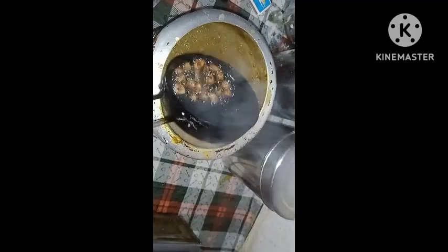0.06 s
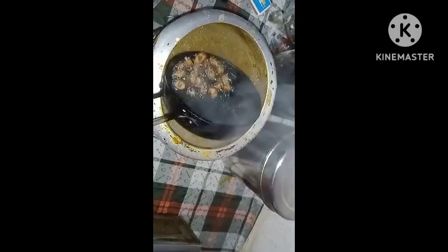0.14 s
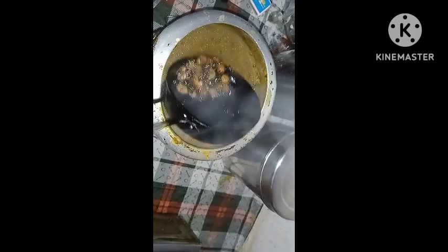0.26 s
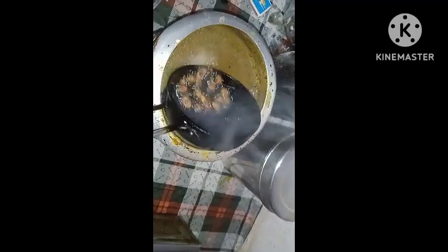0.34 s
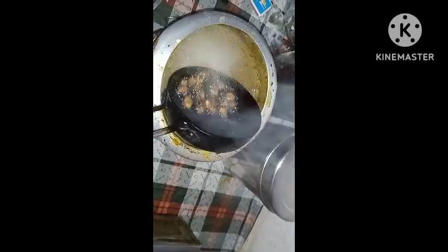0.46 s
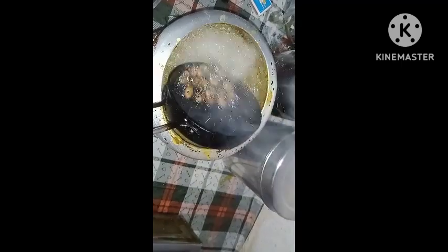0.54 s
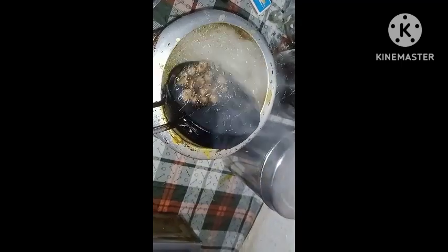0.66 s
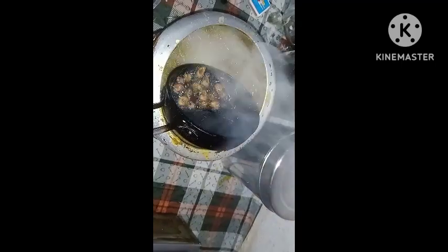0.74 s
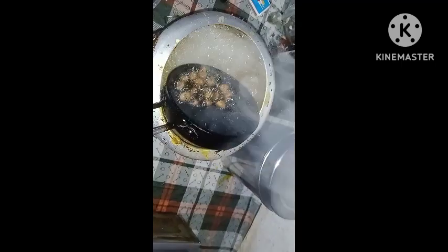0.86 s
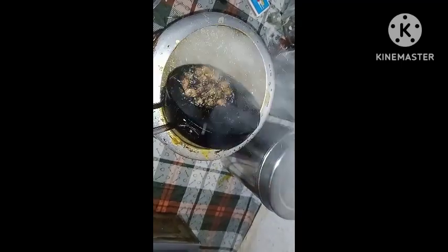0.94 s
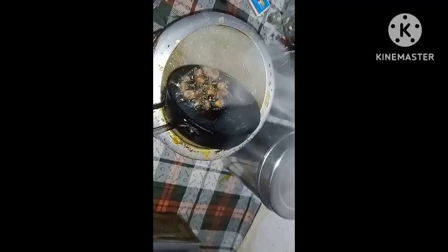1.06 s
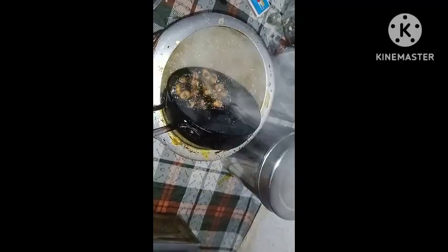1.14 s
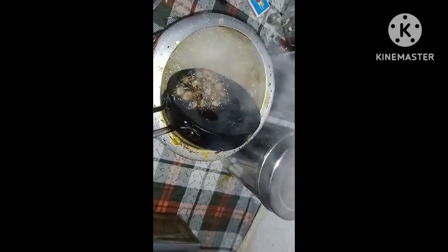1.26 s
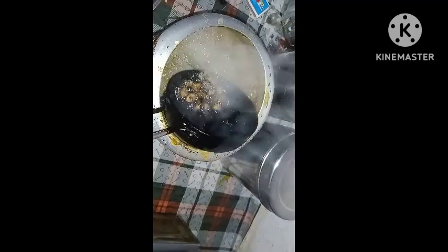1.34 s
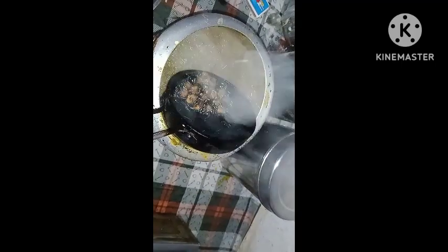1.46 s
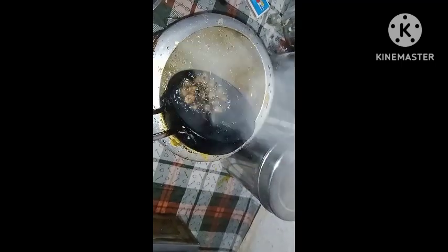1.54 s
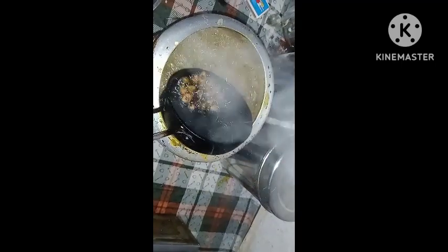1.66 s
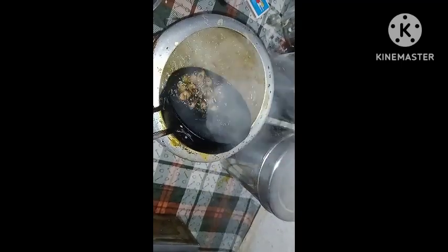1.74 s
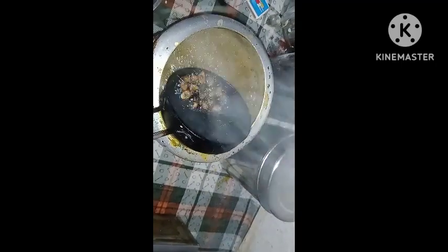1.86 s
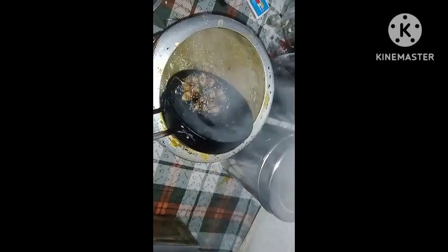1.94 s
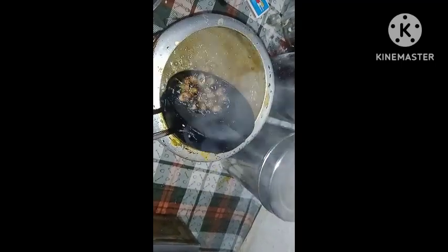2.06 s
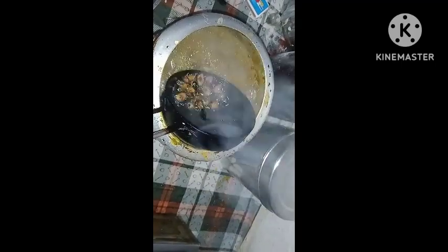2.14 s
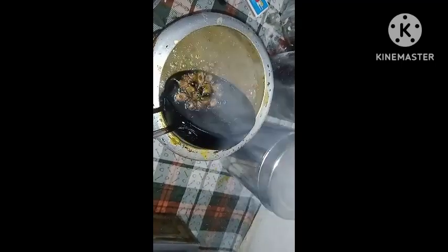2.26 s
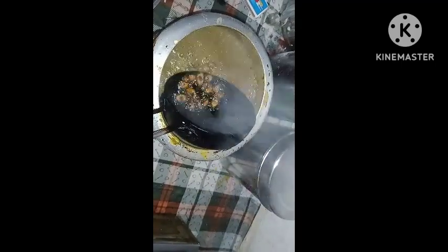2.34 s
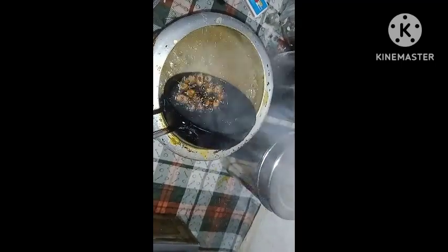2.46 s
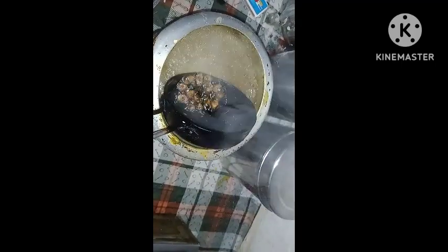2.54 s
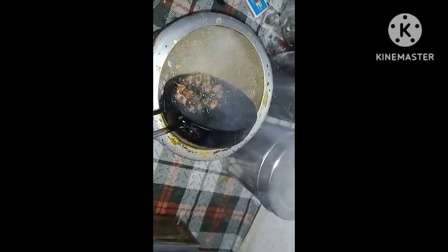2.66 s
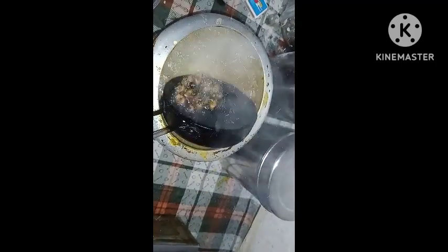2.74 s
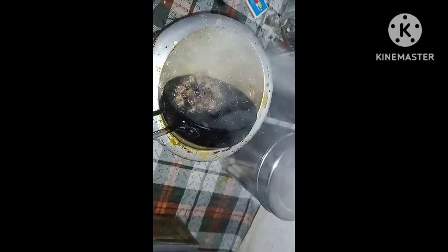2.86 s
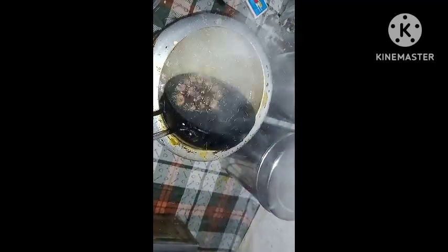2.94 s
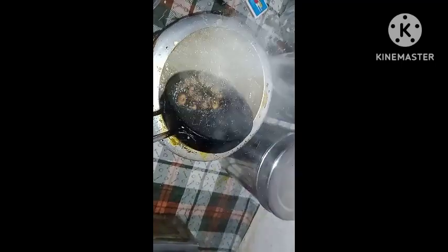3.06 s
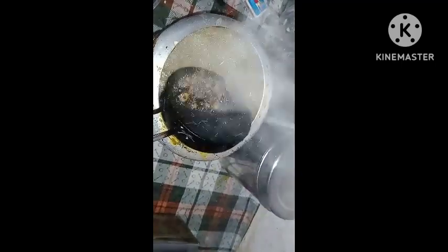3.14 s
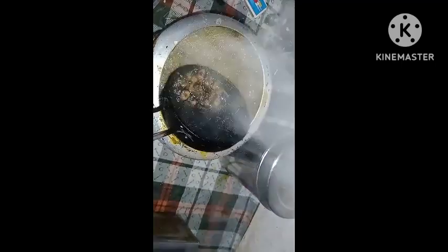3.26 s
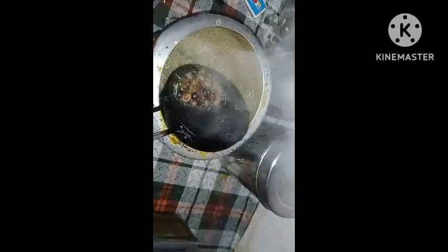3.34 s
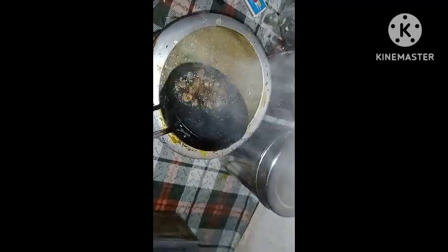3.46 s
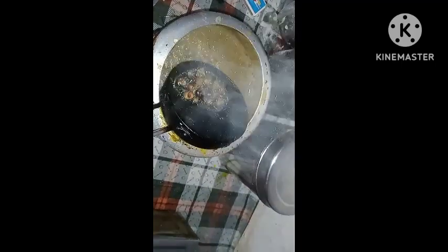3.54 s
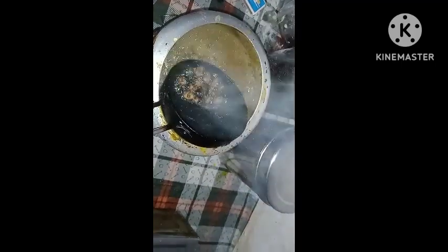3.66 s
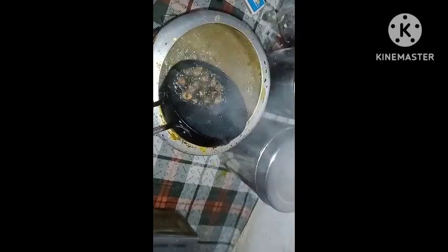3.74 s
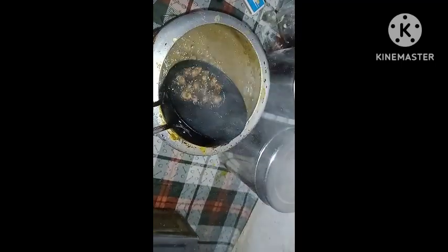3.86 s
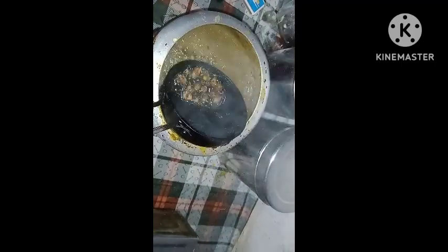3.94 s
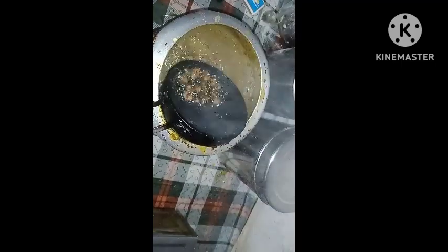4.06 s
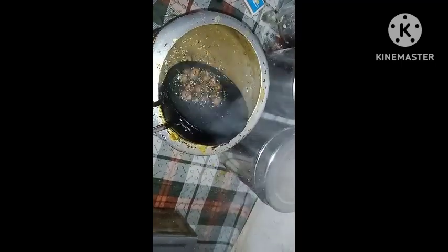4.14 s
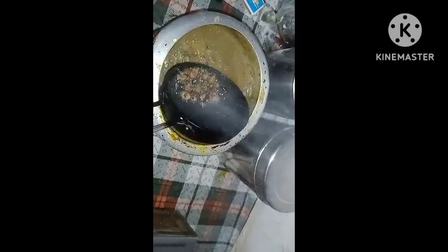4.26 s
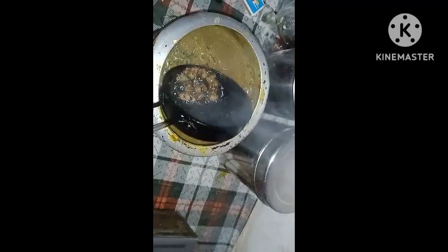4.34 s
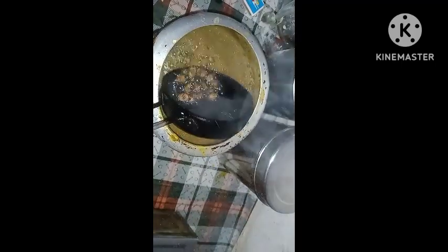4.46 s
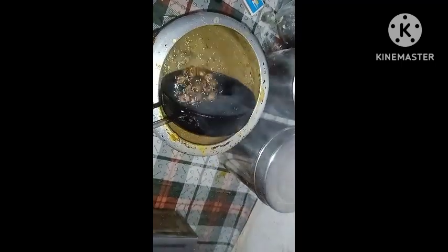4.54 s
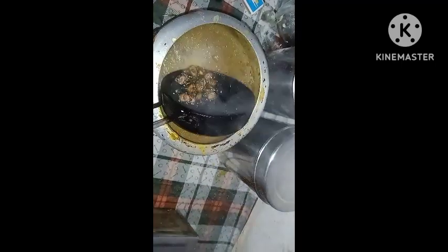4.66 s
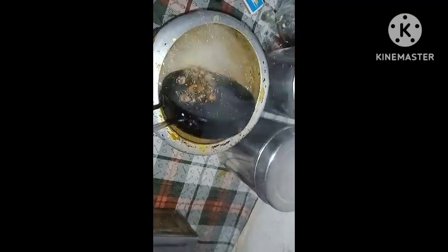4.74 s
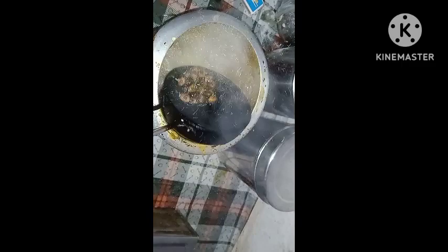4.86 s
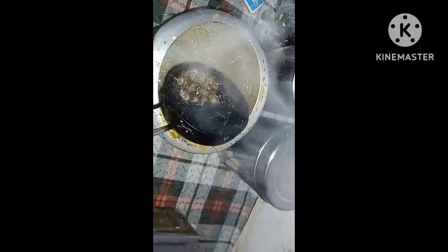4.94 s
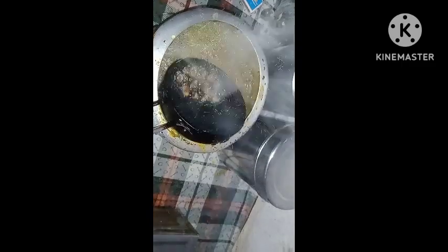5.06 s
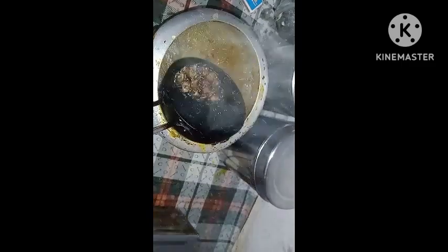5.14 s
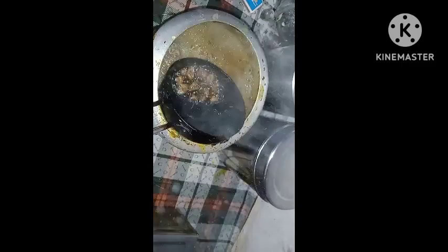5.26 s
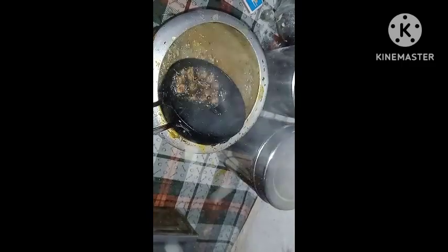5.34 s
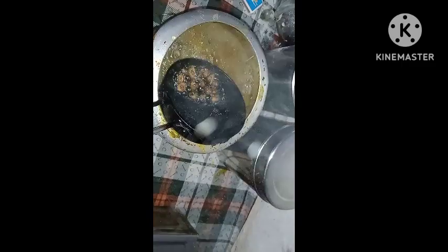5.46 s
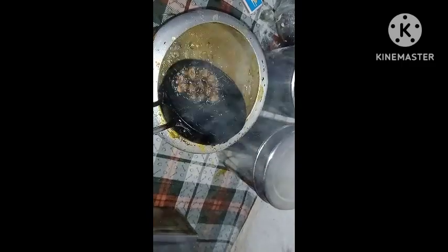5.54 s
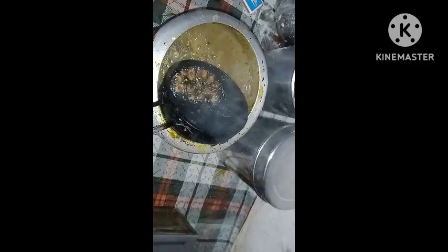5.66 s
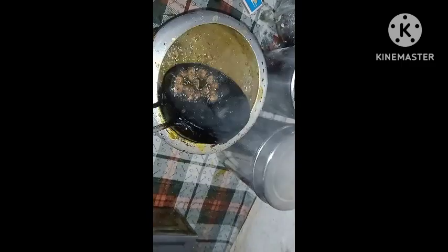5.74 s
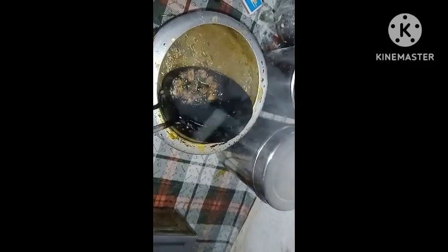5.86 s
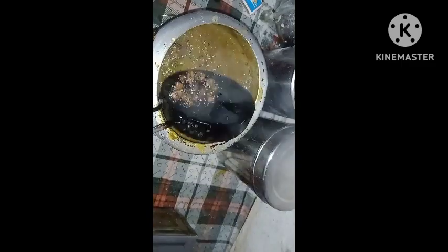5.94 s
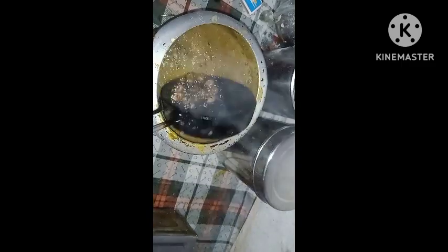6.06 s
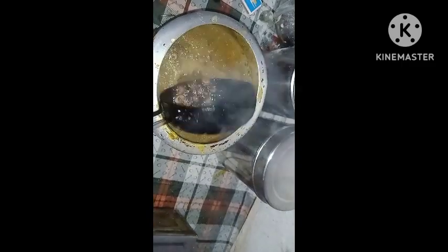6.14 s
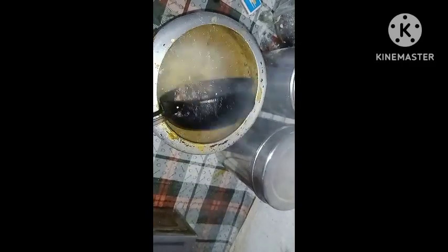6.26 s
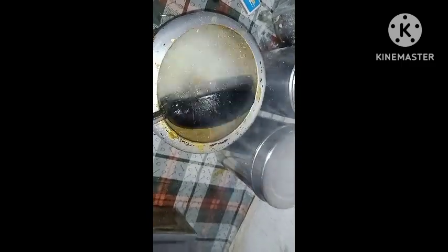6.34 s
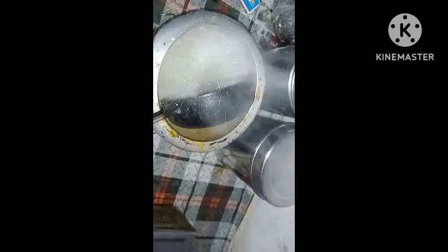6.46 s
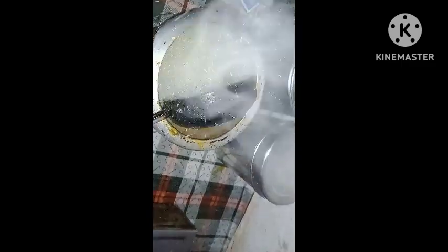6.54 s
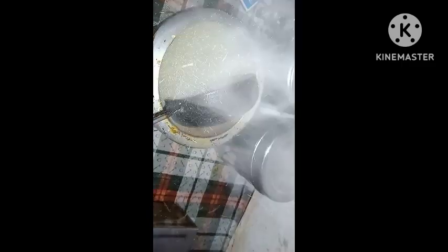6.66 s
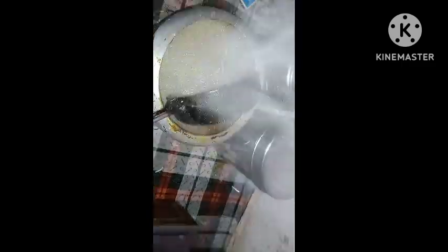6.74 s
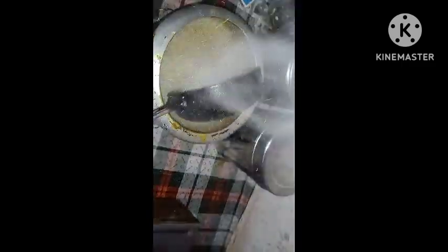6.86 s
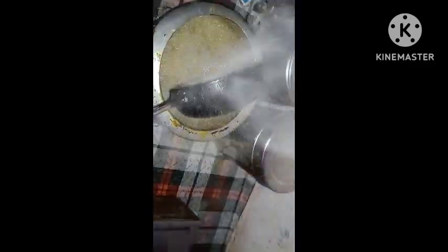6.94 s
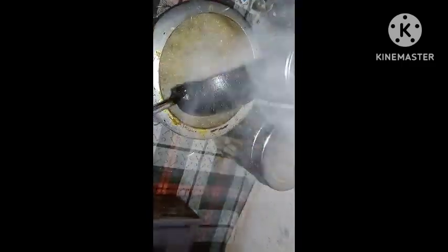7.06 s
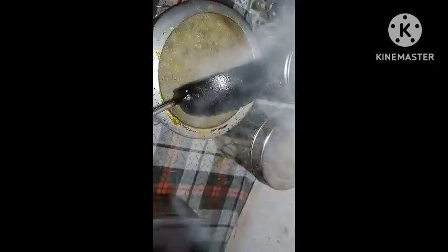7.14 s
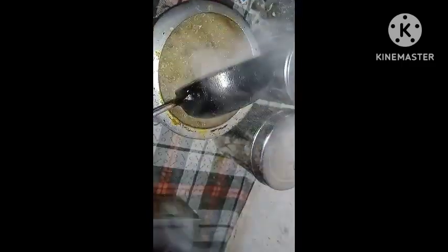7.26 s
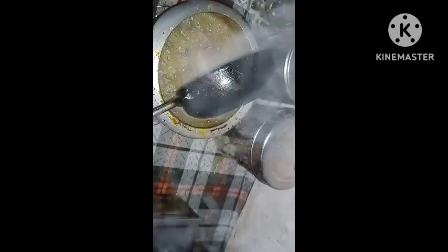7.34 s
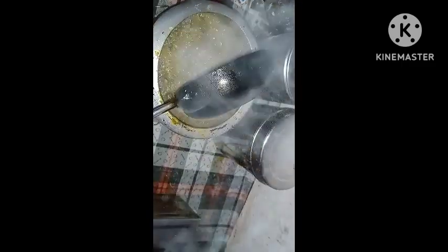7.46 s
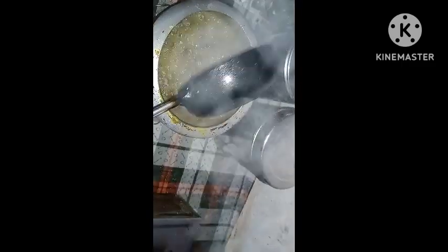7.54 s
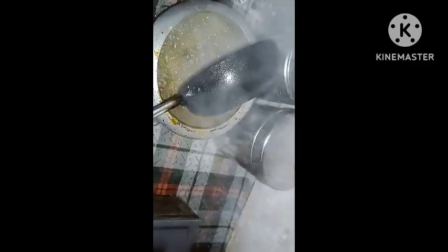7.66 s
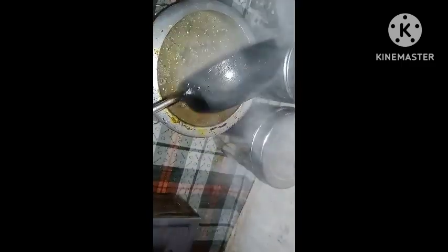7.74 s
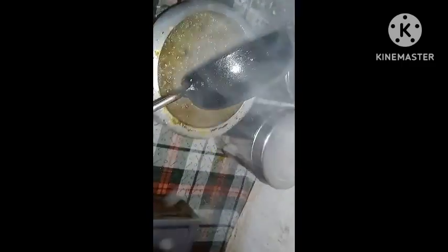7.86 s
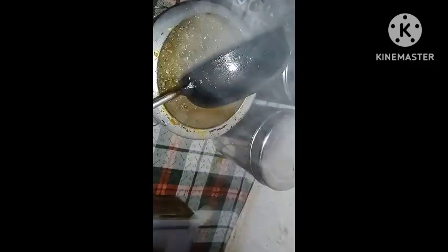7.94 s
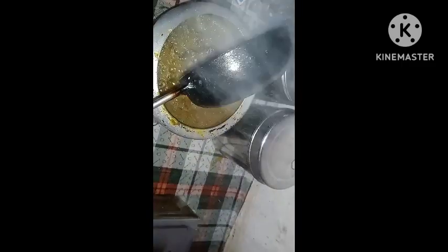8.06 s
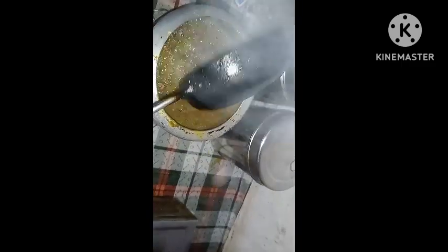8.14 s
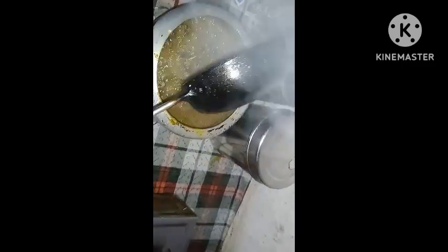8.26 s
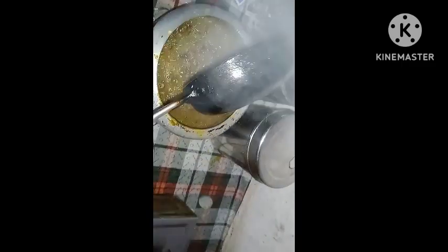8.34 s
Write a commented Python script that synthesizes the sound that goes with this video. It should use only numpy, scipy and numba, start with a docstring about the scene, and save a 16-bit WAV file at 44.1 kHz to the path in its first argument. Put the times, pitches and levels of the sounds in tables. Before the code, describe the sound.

A faint sizzle swells into waves of bright, steamy hiss as hot oil meets curry in a steel pot.

```python
"""A faint sizzle and a few spits of oil come first, then loud surges of hiss as a small iron pan of hot oil
and garlic is dipped and tipped into a steel pot of curry in a home kitchen. Each dip flashes water to
steam. Countless tiny bursts excite the modes of the pot and of the air hollow between pan, soup and pot
wall, whose pitch moves with the pan. Escaping steam squeals and the pot wall hums.
Both channels carry the same signal."""
import sys
import numpy as np
from scipy import signal
from scipy.fft import rfft, irfft, next_fast_len
from scipy.io import wavfile
from scipy.ndimage import uniform_filter1d
from numba import njit

SR = 44100
rng = np.random.default_rng(int(sys.argv[2]) if len(sys.argv) > 2 else 0)


def generate_wav(sig):
    """Save sig (samples, or channels by samples) to the path in sys.argv[1] as 16-bit PCM at SR."""
    pcm = np.round(np.clip(np.atleast_2d(sig).T, -1, 1) * 32767).astype(np.int16)
    wavfile.write(sys.argv[1], SR, pcm)


N = 369999


def from_db(db):
    """Amplitude ratio of a level: tenfold per 20 dB."""
    return 10 ** (np.asarray(db) / 20)


def rms_one(x):
    """Normalisation to unit mean power."""
    return x / np.sqrt(np.mean(x ** 2) + 1e-20)


def in_time(rows):
    """Linear interpolation of (t/s, values...) rows: one curve per value column."""
    times, *columns = np.transpose(rows)
    return [np.interp(np.arange(N) / SR, times, column) for column in columns]


def held(starts, holds, levels_db, rise_db_per_s, fall_db_per_s):
    """Exponential growth, hold and decay: the level in dB of the loudest event at each instant."""
    t = np.arange(N) / SR
    shapes = [db - rise_db_per_s * np.maximum(start - t, 0) - fall_db_per_s * np.maximum(t - start - hold, 0)
              for start, hold, db in zip(starts, holds, levels_db)]
    return np.max(shapes, axis=0)


def drift(hz):
    """Slow random fluctuation: noise through two one-pole low-passes, rms 1."""
    step, settle = 20, 2000
    r = np.exp(-2 * np.pi * hz * step / SR)
    slow = signal.lfilter([1], [1, -2 * r, r * r], rng.standard_normal(N // step + settle + 2))[settle:]
    return np.interp(np.arange(N) / step, np.arange(len(slow)), rms_one(slow))


def coloured(x, spectrum):
    """Spectral shaping by (f/Hz, level/dB) points, rms 1."""
    hz, level_db = np.transpose(spectrum)
    size = next_fast_len(N)
    log_hz = np.log(np.fft.rfftfreq(size, 1 / SR) + 1)
    gain = from_db(np.interp(log_hz, np.log(hz), level_db, left=-99, right=-99))
    return rms_one(irfft(rfft(x, size) * gain, size)[:N])


def resonance(x, hz, width_hz):
    """A damped resonator: two-pole band-pass with unit peak gain."""
    r = np.exp(-np.pi * width_hz / SR)
    feedback = [1, -2 * r * np.cos(2 * np.pi * hz / SR), r * r]
    return signal.lfilter(np.array([1, 0, -1]) * (1 - r * r) / 2, feedback, x)


@njit
def sliding(x, cosine, r):
    """A damped resonator whose natural frequency moves."""
    y = np.zeros(len(x))
    for i in range(2, len(x)):
        y[i] = (1 - r * r) / 2 * (x[i] - x[i - 2]) + 2 * r * cosine[i] * y[i - 1] - r * r * y[i - 2]
    return y


def lifted(x, modes, waver_db):
    """Modal response: each mode lifts or cuts its band, wavering as the bursts wander over the pot."""
    out = x
    for hz, width_hz, lift_db in modes:
        coupling = from_db(waver_db * drift(10.4))
        out = out + (from_db(lift_db) - 1) * coupling * resonance(x, hz, width_hz)
    return rms_one(out)


def air_modes(x, pitch_hz, modes):
    """Forced resonance of modes (pitch ratio, width/Hz, level/dB), filtered twice for steep skirts."""
    out = 0
    for k, (ratio, width_hz, level_db) in enumerate(modes):
        cosine = np.cos(2 * np.pi * ratio * pitch_hz / SR)
        r = np.exp(-np.pi * width_hz / SR)
        patch = np.roll(x, 397 * (k + 1))   # a time shift gives each mode its own bursts
        out = out + from_db(level_db) * sliding(sliding(patch, cosine, r), cosine, r ** 2)
    return rms_one(out)


def mains_hum(hz=48.7, level_db=-83):
    """Alternating current gives a faint, steady pure tone."""
    return from_db(level_db) * np.sin(2 * np.pi * hz * np.arange(N) / SR)


def kitchen(x, t60_s=0.21, level_db=-18):
    """Reverberation: reflections from walls and steel ware form a dull, exponentially decaying tail."""
    t = np.arange(SR // 2) / SR
    dull_noise = signal.lfilter([1], [1, -.5], rng.standard_normal(len(t)))
    tail = dull_noise * from_db(-60 * t / t60_s) * (t > .004)
    return from_db(level_db) * signal.fftconvolve(x, tail / np.sqrt(np.sum(tail ** 2)))[:N]


def pot_wall_hum(hiss_db, hz=96, build_s=0.25, rest_db=-80.5, quiet_boil_db=-53):
    """Forced vibration: one low wall mode builds up with the recent boil and swells now and then."""
    # swells of the hum: t/s, hold/s, peak level/dB
    swells = [(.7, .02, -69), (0.97, .01, -64), (1.316, 0.086, -61), (1.58, .04, -67), (1.96, .01, -67),
              (2.62, 0.027, -82), (2.85, .01, -65), (3.033, .05, -59), (3.27, 0.09, -76),
              (4.077, 0.042, -74), (4.812, .02, -60), (4.994, .03, -57), (5.14, .1, -67),
              (6.555, .02, -52.5), (6.72, 0.15, -50), (7.113, 0.018, -61), (8.074, 0.027, -72)]
    span = round(build_s * SR)
    recent_db = uniform_filter1d(hiss_db, span, origin=(span - 1) // 2)
    driven_db = rest_db + 0.42 * (recent_db - quiet_boil_db) + 3 * drift(3.3)
    swell_db = held(*np.transpose(swells), rise_db_per_s=200, fall_db_per_s=124)
    phase = 2 * np.pi * hz * np.arange(N) / SR + .7 * drift(3.5)
    return (from_db(driven_db) + from_db(swell_db)) * np.sqrt(2) * np.sin(phase)


def oil_spits():
    """Transient excitation: a bursting drop gives a puff of band noise that swells and dies away."""
    # single spits of oil: t/s, peak level/dB, f/Hz, width/Hz, swell time/s
    spits = [(0.337, -41, 4800, 1200, .006), (.421, -37, 4300, 600, .0012),
             (0.4262, -28.5, 1720, 260, 0.0015), (2.06, -31.5, 4650, 200, 0.0052),
             (3.266, -30, 3140, 600, 0.0056), (3.266, -28, 4320, 500, .004),
             (3.796, -32, 6300, 2500, .0015), (3.973, -34, 7000, 2000, 0.0036),
             (4.225, -47, 9000, 5000, 0.0059), (4.395, -34.5, 4130, 1500, 0.0037),
             (4.458, -32, 7000, 3000, 0.0018), (5.903, -36, 6000, 3000, .002),
             (6.097, -31, 6300, 1800, 0.0057), (6.138, -35, 3720, 700, .006),
             (6.152, -29, 6440, 2000, 0.0039), (6.186, -33.5, 5500, 3000, 0.0048),
             (7.463, -31, 5930, 2500, 0.0019)]
    length = 1800
    t = np.arange(length) / SR
    out = np.zeros(N + length)
    for start, peak_db, hz, width_hz, swell_s in spits:
        crackle = rng.standard_normal(length) * t * np.exp(-t / swell_s)
        puff = resonance(resonance(crackle, hz, width_hz), hz, width_hz)
        out[round(start * SR):][:length] += from_db(peak_db) * puff / np.abs(puff).max()
    return out[:N]


def steam_squeal(air):
    """Flow noise: steam squeezed out from under the pan squeals in a narrow, gliding band."""
    # squeals: t/s, hold/s, first f/Hz, last f/Hz, level/dB over the hiss
    squeals = [(0.525, 0.085, 3830, 4200, -8.5), (1.22, 0.064, 4450, 4270, -5),
               (1.464, 0.16, 3820, 4100, -7), (4.786, 0.044, 3980, 4140, -5), (6.207, 0.037, 4640, 4630, 2),
               (6.85, 1, 4140, 3540, -7.5)]
    start, hold, first_hz, last_hz, level_db = np.transpose(squeals)
    glide_points = np.transpose([start, first_hz, start + hold, last_hz]).reshape(-1, 2)
    pitch_hz, = in_time(glide_points)
    envelope = from_db(held(start, hold, level_db, rise_db_per_s=300, fall_db_per_s=300))
    return envelope * air_modes(air, pitch_hz, [(0.97, 250, 0)])


def cavities(soup, air, fine, pan_air, waver_db=2):
    """Cavity resonance: the air under the pan and in its bowl rings at pitches that move with the pan."""
    # cavity tuning: t/s, f/Hz of hollow, upper hollow and bowl, then level/dB of each over the hiss
    tuning = [(0, 1750, 2490, 3280, -10.5, -21, -0.5), (.38, 1730, 2450, 3120, -9, -16, -5),
              (.47, 1830, 2440, 3260, -1, -7.5, -5.5), (1.0, 1820, 2460, 3270, -4.5, -10, -10.5),
              (1.5, 1837, 2450, 3250, -7, -18, -14), (2.3, 1715, 2456, 3260, -1.5, -9, -15.5),
              (2.6, 1840, 2490, 3280, -5.5, -15.5, -12.5), (3.1, 1940, 2540, 3240, -5, -9, -14),
              (3.5, 1776, 2500, 3210, -3, -18, -14), (4.5, 1780, 2450, 3290, -2.5, -8, -12.5),
              (4.85, 1944, 2500, 3250, -4.5, -9, -10), (5.3, 1815, 2460, 3220, -4.5, -14.5, -16),
              (6.1, 1740, 2500, 3170, -4, -16, -9), (6.3, 1840, 2420, 3180, -1.5, -6, -2),
              (6.45, 2070, 2585, 3030, -6.5, -11.5, -6.5), (7.0, 2090, 2690, 3240, 0.8, -8, -3),
              (7.3, 2010, 2730, 3150, -0.7, 0, -2), (7.6, 1790, 2620, 3200, -1.5, -9, -5),
              (8.39, 1720, 2360, 3020, -5, -5.5, -1)]
    # main modes of the hollow: pitch ratio, width/Hz, level/dB
    hollow_modes = [(0.99, 125, 7.5), (0.919, 210, 1.5), (0.856, 370, -3)]
    # upper modes of the hollow: pitch ratio, width/Hz, level/dB
    upper_modes = [(0.99, 99, 1), (1, 1200, -11)]
    # modes of the air in the pan's bowl: pitch ratio, width/Hz, level/dB
    bowl_modes = [(0.878, 70, -6), (.95, 150, -4), (1.003, 111, -1), (1.08, 300, -7)]
    hollow_hz, upper_hz, bowl_hz, hollow_db, upper_db, bowl_db = in_time(tuning)
    steady_mode = from_db(-4) * air_modes(soup, np.full(N, 1614), [(0.98, 206, 0)])
    hollow = from_db(hollow_db) * (air_modes(air, hollow_hz, hollow_modes) + steady_mode)
    upper = from_db(upper_db + waver_db * drift(5.1)) * air_modes(fine, upper_hz, upper_modes)
    bowl = from_db(bowl_db + waver_db * drift(9.1)) * air_modes(pan_air, bowl_hz, bowl_modes)
    return hollow + upper + bowl


def steam_bursts(per_s, spread_db, jet, flutter_db, common_db):
    """Shot noise: bubbles of uneven size burst at random over a smooth jet, and the swarm flutters."""
    sizes = from_db(spread_db * np.minimum(rng.exponential(1, N), 5)) * rng.choice([-1, 1], N)
    pops = rms_one(sizes * (rng.random(N) < per_s / SR))
    flutter = from_db(common_db + flutter_db * drift(11.8))
    return (pops + jet * rng.standard_normal(N)) * flutter


def boil(soup, air, fine):
    """Source and filter: four bands of burst noise, from seething to spray, excite the pot's modes."""
    # spectrum of the seething soup: f/Hz, level/dB
    seethe_spectrum = [(25, -36), (70, -28), (112, -21.5), (135, -19), (230, -14.5), (270, -23.5),
                       (380, -21), (520, -20), (700, -5), (1200, -9), (1500, -10), (2100, -19), (3000, -22)]
    # low pot and kitchen resonances, with dips where echoes cancel: f/Hz, width/Hz, lift/dB
    low_modes = [(147, 19, 7.5), (166, 17, -0.5), (204, 8.8, 7.5), (264, 17, -14), (301, 22.4, 9.5),
                 (382, 19, -7), (454, 39, 12), (510, 22, -2), (561, 18, 7), (582, 12, 1), (613, 28, 8),
                 (730, 39, 10.5), (762, 23, -1.5), (790, 52, -15), (831, 45, 5), (859, 41, 4),
                 (965, 52, -4), (989.5, 62, 10), (1118, 54, 8), (1146, 44, -3.5)]
    # spectrum of the simmer: f/Hz, level/dB
    simmer_spectrum = [(2400, -35), (3300, -16), (3650, 0.5), (3850, 3.5), (4800, 0.5), (5300, -14),
                       (7000, -50)]
    # middle pot modes: f/Hz, width/Hz, lift/dB
    mid_modes = [(3954, 50, 5.4), (3985, 26, 4.5), (4207, 58, 7.1), (4490, 99, 4.9), (4684, 45, 7.7)]
    # spectrum of the hiss: f/Hz, level/dB
    hiss_spectrum = [(1500, -34), (2200, -24), (3400, -12), (4500, -18), (5200, -0.5), (6900, 3),
                     (7500, -2), (8000, -9), (9500, -26), (12000, -51)]
    # high pot modes: f/Hz, width/Hz, lift/dB
    high_modes = [(5070, 150, 8.3), (5480, 115, 6.4), (5840, 34, 10), (6050, 32, 5.2), (6280, 54, 6.8),
                  (6470, 63, 5.9), (6960, 190, 4.6), (7460, 110, 4.8)]
    # spectrum of the fine spray: f/Hz, level/dB
    spray_spectrum = [(6000, -35), (7800, -8.5), (9500, -10), (11000, -11), (13000, -16.5), (14000, -10),
                      (14500, -8.5), (15000, -3), (15400, -1), (16000, -5)]
    # highest pot modes: f/Hz, width/Hz, lift/dB
    top_modes = [(8780, 140, 3.4), (9460, 200, 5.1), (10040, 170, 4.2), (10970, 190, 2.3),
                 (11960, 130, 2.1)]
    # balance of the bands: t/s, then level/dB over the hiss of seething, simmer and spray
    balance = [(0, -2.5, -6, -4.5), (.38, -3.5, -5, -3), (.47, -2, -1, -4), (.8, -2, -4, -5),
               (1.3, -4, -5, -6.5), (1.6, -7, -4.5, -5), (2.1, 0.5, -3.5, -2), (2.55, -6.5, -5, -4),
               (2.7, -5.5, -9, -4), (3.05, -4, -7.5, -6.5), (3.6, -4.5, -4.5, -3), (4.3, -1, -3, -3),
               (4.9, -4.5, -5.5, -4.5), (5.4, -2, -4.5, -4.5), (6.1, -4.5, -2.5, -3), (6.4, -2, -5, -6),
               (7.1, -2, -5, -4.5), (7.6, -4.5, -5.5, -5.5), (8.39, -5.5, -2, -5)]
    seethe_db, simmer_db, spray_db = in_time(balance)
    seethe = from_db(seethe_db) * lifted(coloured(soup, seethe_spectrum), low_modes, waver_db=1.0)
    simmer = from_db(simmer_db) * lifted(coloured(soup, simmer_spectrum), mid_modes, waver_db=4.5)
    hiss = lifted(coloured(fine, hiss_spectrum), high_modes, waver_db=2.0)
    spray = from_db(spray_db) * lifted(coloured(air, spray_spectrum), top_modes, waver_db=4.0)
    return seethe + simmer + hiss + spray


def scene():
    """Superposition: boil, cavities and squeal surge together; hums, spits and reverberation add."""
    # strength of the boil, surging with each dip: t/s, hiss level/dB
    surges = [(0.0, -51.5), (0.18, -51), (0.3, -57), (0.4, -55.5), (0.49, -32.5), (0.56, -34.5),
              (0.77, -44), (0.86, -33), (1.0, -35), (1.12, -42.5), (1.24, -30.5), (1.42, -39.5),
              (1.54, -32), (1.7, -36.5), (2.05, -42), (2.45, -43), (2.55, -34.5), (2.64, -35.5),
              (3.11, -32), (3.57, -48), (4.16, -49.5), (4.55, -46), (4.6, -49), (4.79, -33.5), (5.0, -33.5),
              (5.09, -41.5), (5.77, -52), (6.05, -52), (6.26, -38), (6.31, -34.5), (6.38, -28.5),
              (6.63, -30.5), (6.73, -29.5), (7.1, -41.5), (8.01, -48), (8.39, -51.5)]
    hiss_db = uniform_filter1d(*in_time(surges), round(0.085 * SR))
    common_db = 0.19 * drift(23.0) + 0.85 * drift(31)   # flutter shared by the whole pot
    soup = steam_bursts(3000, spread_db=3.25, jet=0.88, flutter_db=-0.38, common_db=common_db)
    air = steam_bursts(5000, spread_db=2.64, jet=1.0, flutter_db=0.16, common_db=common_db)
    fine = steam_bursts(9000, spread_db=4.0, jet=1.0, flutter_db=-1.0, common_db=common_db)
    pan_air = np.roll(air, 5000)   # another patch of bursts
    sizzle = boil(soup, air, fine) + cavities(soup, air, fine, pan_air) + steam_squeal(pan_air)
    pot = from_db(hiss_db) * sizzle + pot_wall_hum(hiss_db) + oil_spits()
    return np.tile(pot + kitchen(pot) + mains_hum(), (2, 1))


def record(dry, cutoff_hz=15480):
    """Band limiting: a steep low-pass removes the highest treble."""
    return signal.sosfilt(signal.ellip(14, .5, 70, cutoff_hz, fs=SR, output="sos"), dry)


dry = scene()
out = record(dry)
generate_wav(out)
```